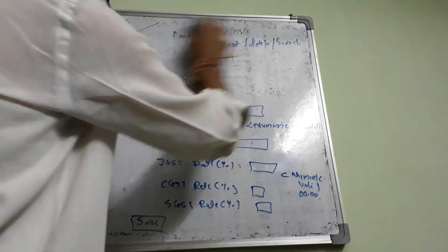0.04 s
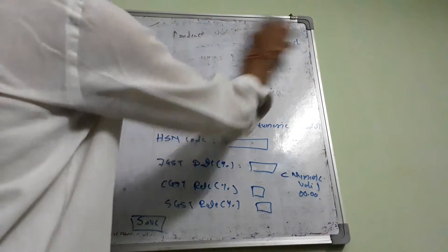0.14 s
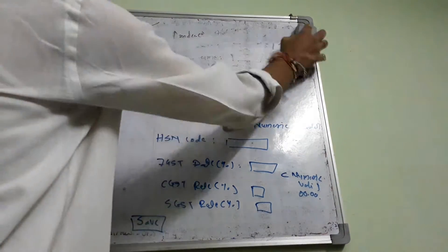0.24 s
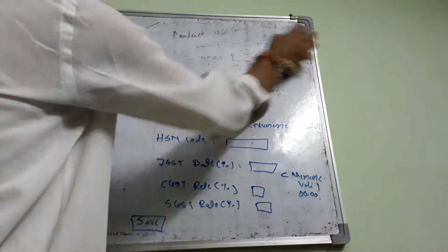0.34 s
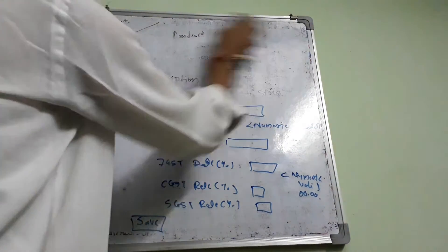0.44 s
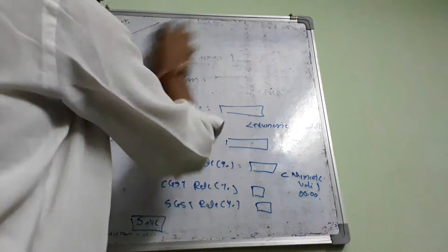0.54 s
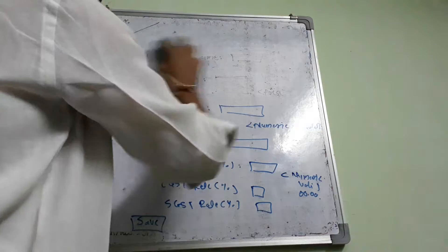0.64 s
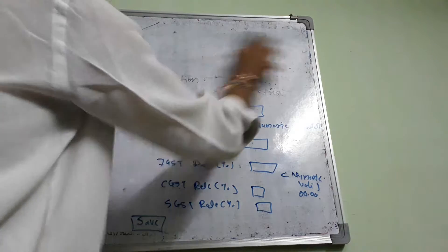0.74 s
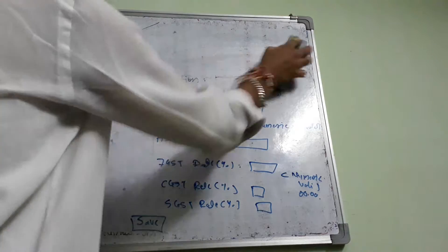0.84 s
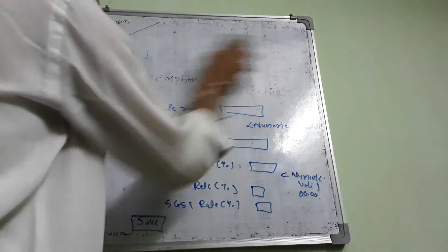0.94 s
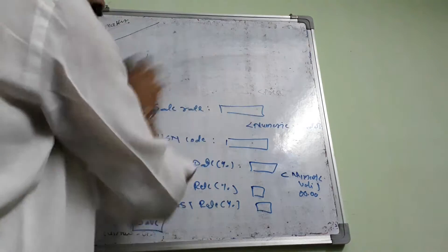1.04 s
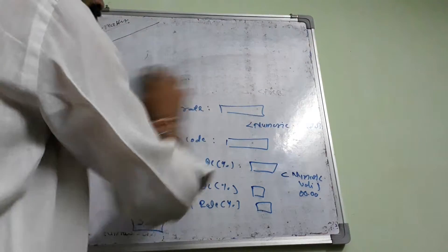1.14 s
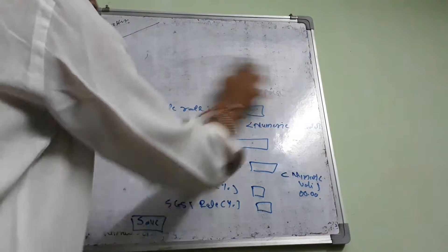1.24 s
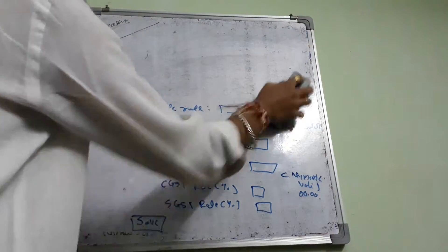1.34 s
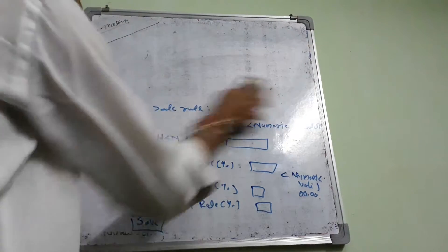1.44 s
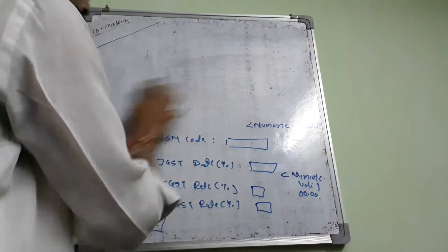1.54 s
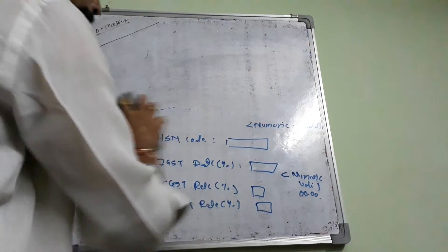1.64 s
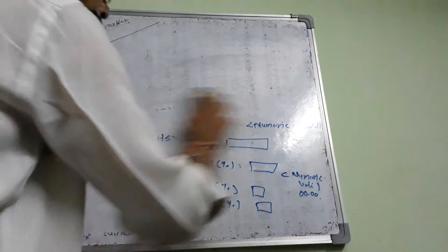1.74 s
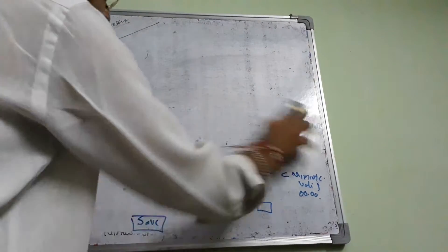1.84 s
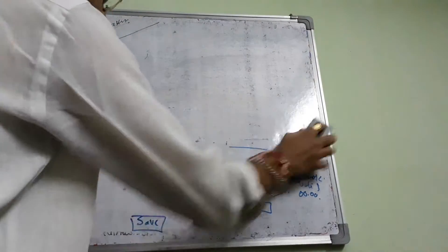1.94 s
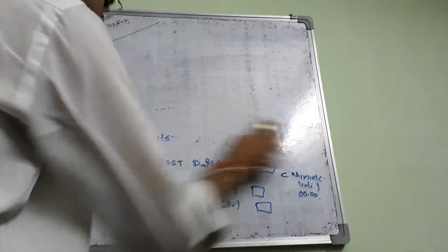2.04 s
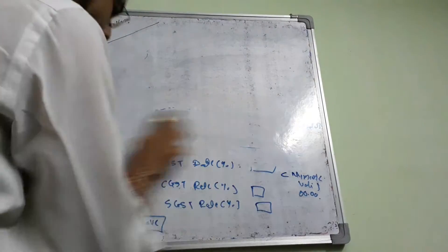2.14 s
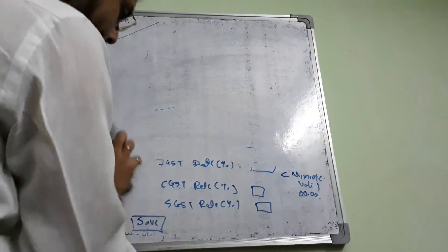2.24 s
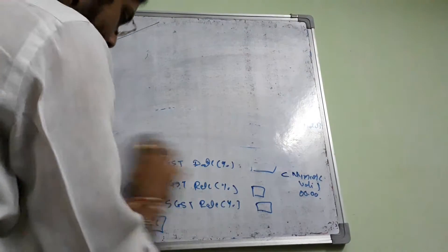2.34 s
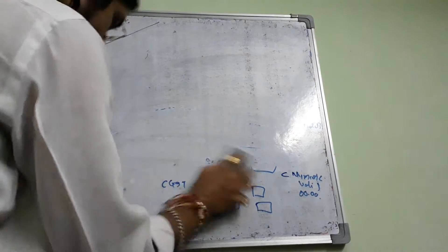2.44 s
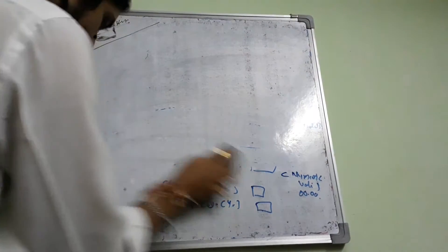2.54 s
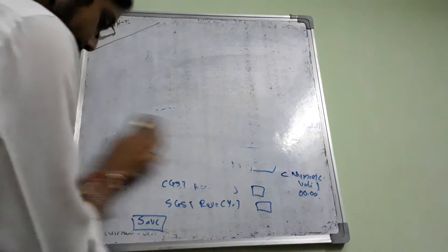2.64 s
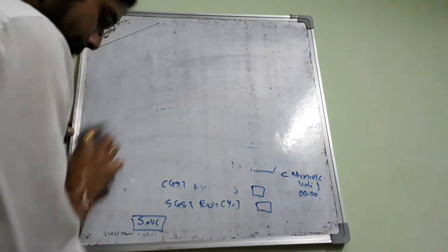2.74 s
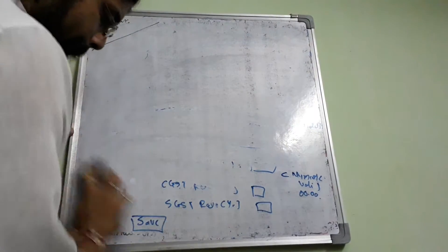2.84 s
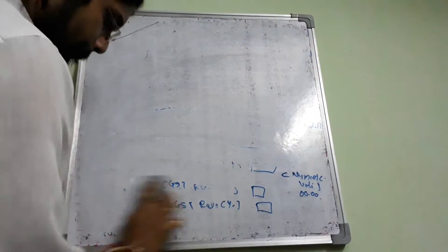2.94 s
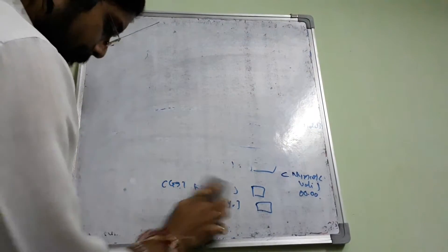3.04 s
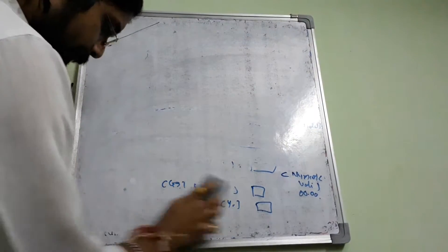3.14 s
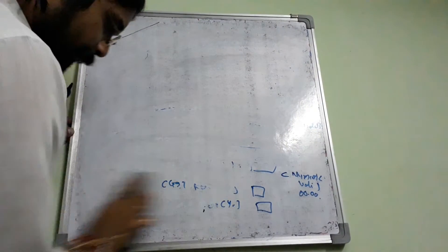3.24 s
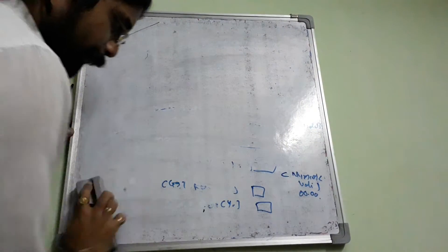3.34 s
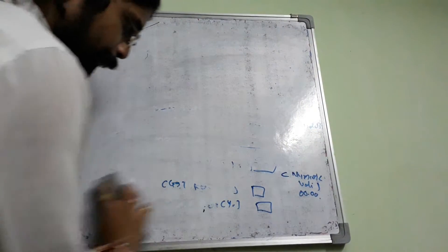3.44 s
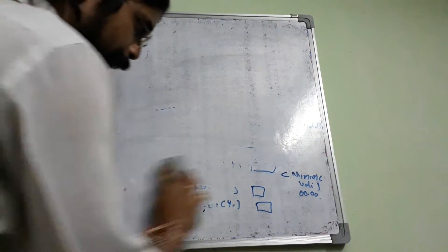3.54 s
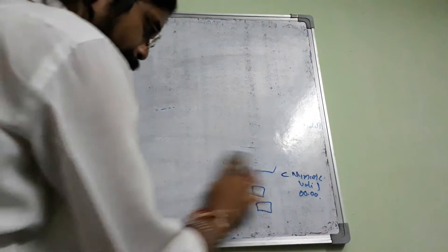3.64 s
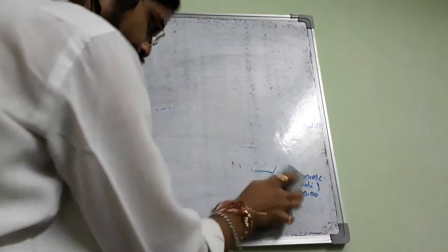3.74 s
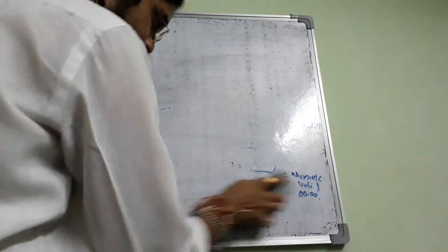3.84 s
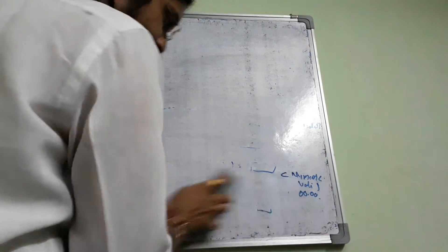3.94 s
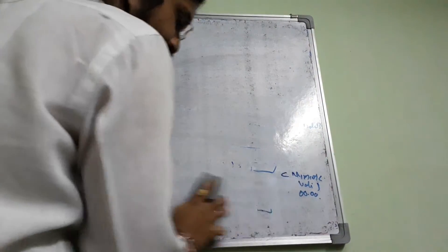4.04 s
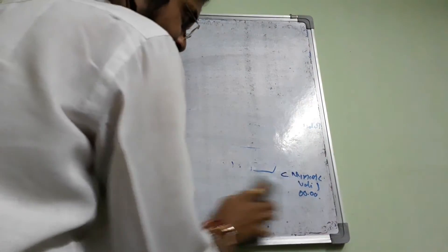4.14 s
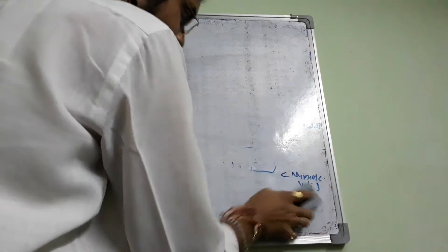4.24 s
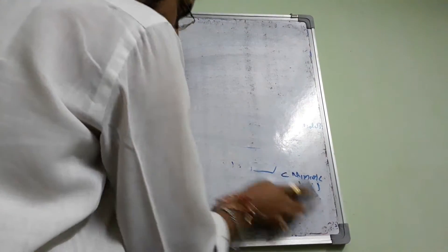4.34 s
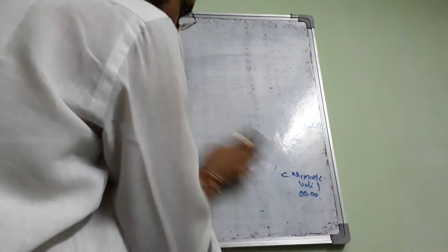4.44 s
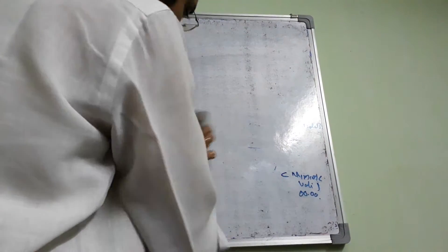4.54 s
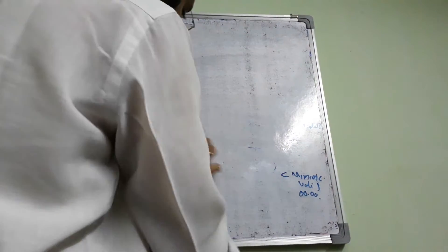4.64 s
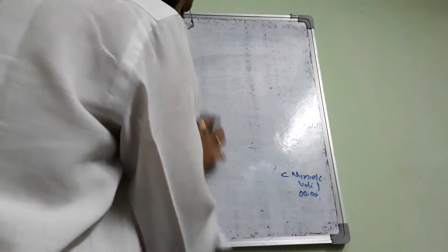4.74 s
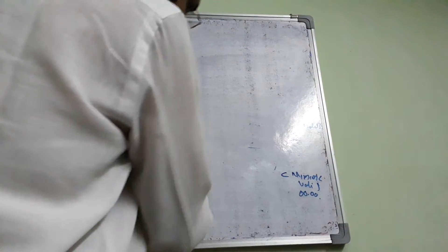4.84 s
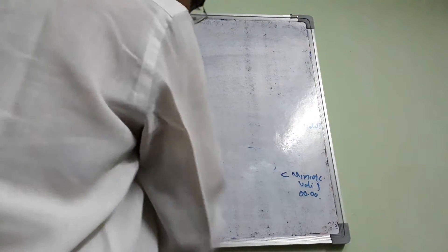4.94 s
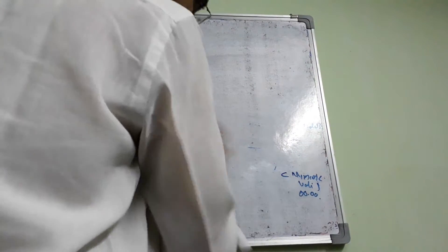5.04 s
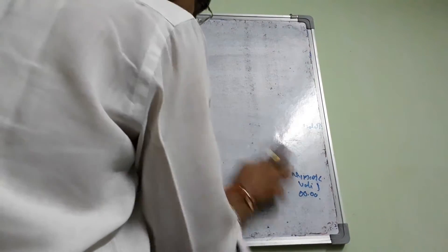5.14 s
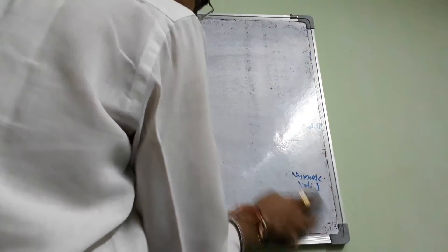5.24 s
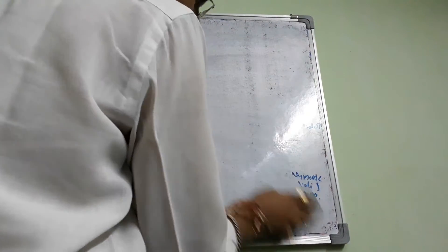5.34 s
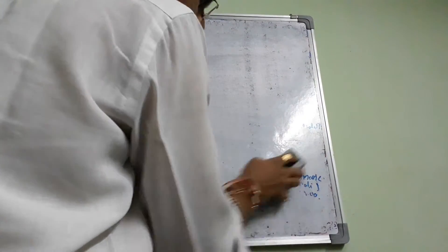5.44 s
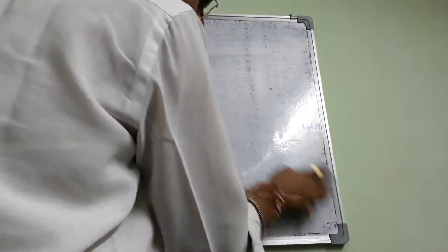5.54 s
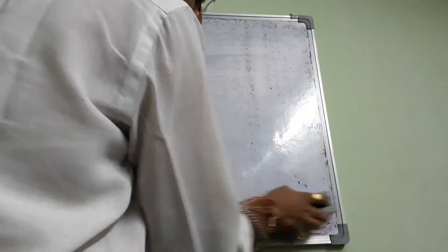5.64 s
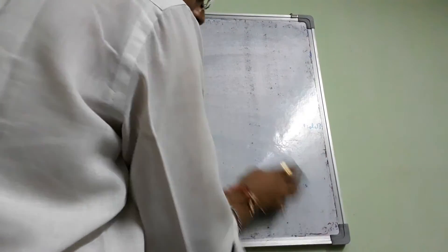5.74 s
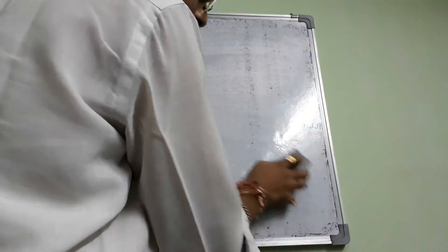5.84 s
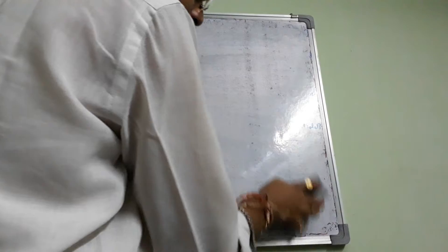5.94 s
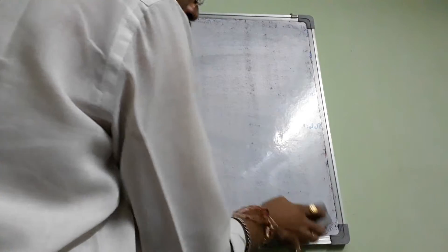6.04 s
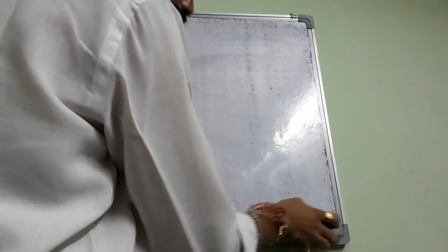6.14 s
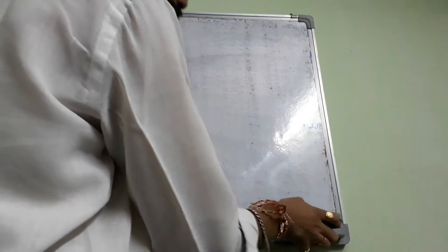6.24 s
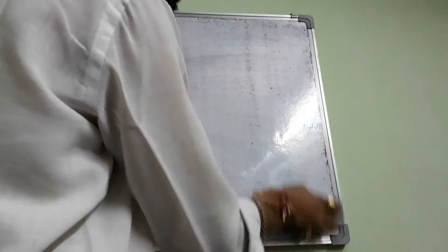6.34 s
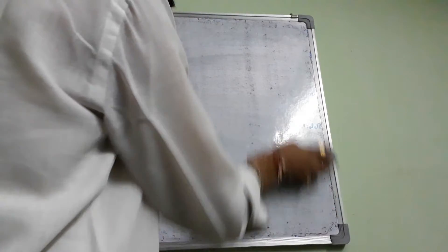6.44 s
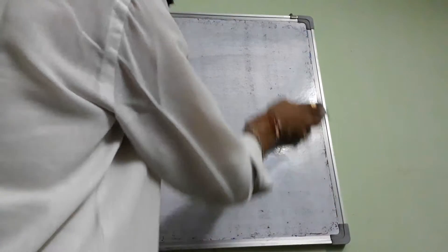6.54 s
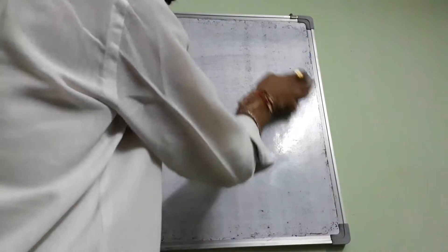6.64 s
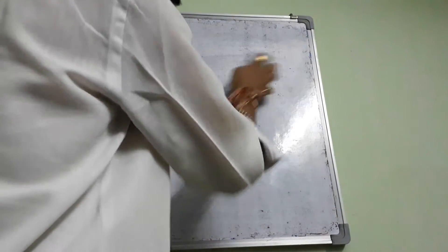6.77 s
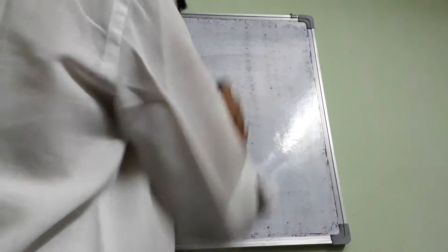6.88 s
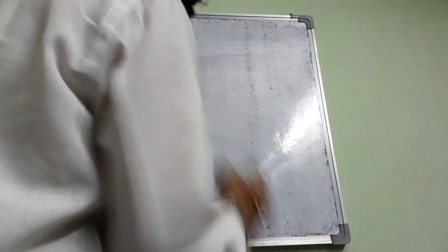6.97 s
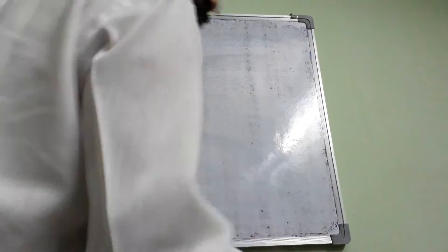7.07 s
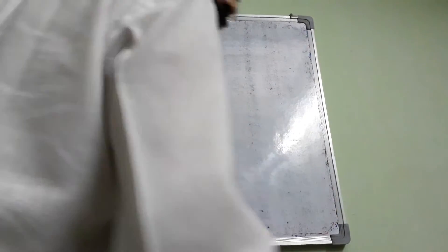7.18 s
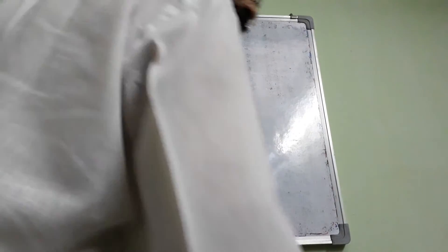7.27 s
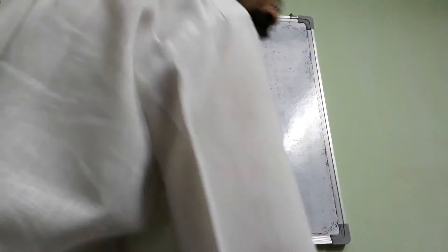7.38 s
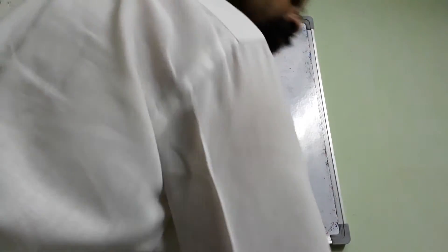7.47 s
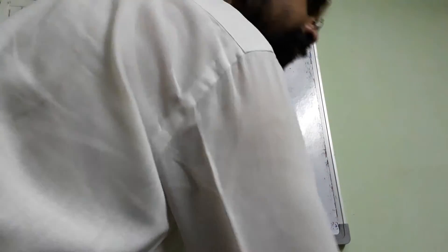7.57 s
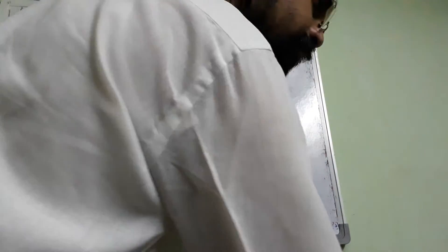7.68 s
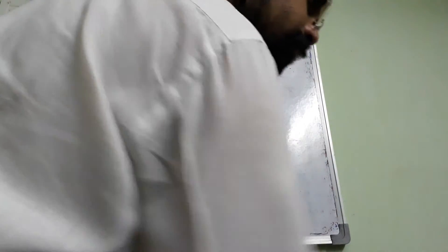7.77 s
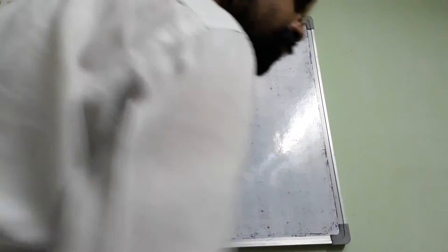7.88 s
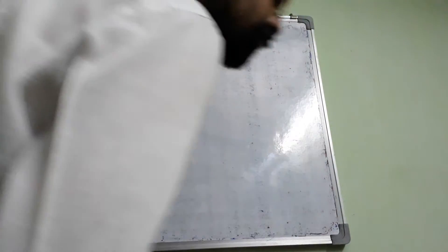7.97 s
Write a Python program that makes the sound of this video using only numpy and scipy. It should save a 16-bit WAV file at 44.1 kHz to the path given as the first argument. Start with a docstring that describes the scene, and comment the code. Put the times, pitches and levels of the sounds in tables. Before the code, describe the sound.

A low, steady fan drone fills a small hard-walled room, heard by one microphone a few steps away. From 0 s a felt eraser rubs to and fro on a whiteboard, roughly three strokes a second, each a grainy airy hiss with a lower rasp that swells and fades; the strongest is around 1 s. Between 1.1 and 2.2 s the hard shell ticks the metal frame, clicks hollowly and bumps the board softly. Mostly plain wiping follows until a bright, prominent click at 3.9 s. Strokes then become generally softer and less even, with faint ticks around 4.3-4.6 and 5.5-5.9 s. A clearer bump and tick come at 6.6 s, followed by a fuller rub and lighter ticks. At 7.5 s a loud, sharp knock hits the board, then a duller one at 7.67 s and a tight double knock at 7.75 s, with short room echo as a last rub swells.

```python
"""A felt eraser is rubbed to and fro over a whiteboard: two grainy noises that swell with each stroke.
Its hard shell taps the metal frame, clicks and rings, and bumps the board softly; at the end it knocks loudly.
Every blow sets decaying sine waves ringing, some under a short burst of noise.
A fan, made of shaped steady noise, runs in the small hard-walled room, whose echo is fading noise.
One microphone hears it all from a few steps away."""
import sys
import numpy as np
from scipy import signal
from scipy.fft import rfft, irfft, next_fast_len
from scipy.io import wavfile

SR = 44100
rng = np.random.default_rng(int(sys.argv[2]) if len(sys.argv) > 2 else 0)


def store_wav(level_fs):
    """Save 16-bit WAV to argv[1]."""
    pcm = np.round(np.clip(np.atleast_2d(level_fs), -1, 1) * 32767)
    wavfile.write(sys.argv[1], SR, pcm.T.astype(np.int16))


N = 353241   # length in samples

# Ringing tones of the board. Each row: pitch in Hz, relative level in dB, time to fade by 60 dB in seconds.
BOARD_MODES = [(666, -0.5, 0.011), (865, -4, 0.028), (1042, -1.5, 0.021), (1317, 2, 0.0098),
               (1640, 1.5, 0.0095), (2000, 1.5, 0.0093), (2550, 5.5, 0.0026), (3480, -6, 0.0046),
               (4130, -4, 0.0035), (5300, -10, 0.004)]
# Soft bumps on the board. Each row: start in seconds, knock strength in dB,
# strength in dB of the push that flexes the board.
BUMP_ROWS = [(1.139, -29, -43.5), (1.302, -34, -43), (1.913, -29.5, -62), (2.22, -33.5, -45.5),
             (3.902, -32.5, -60), (4.567, -36.5, -56), (6.5621, -21.5, -42.5), (6.655, -29, -57)]
# Loud knocks on the board. Each row: start in seconds, ringing strength in dB, crack strength in dB,
# contact cut-off in Hz, strength in dB of the push that flexes the board.
KNOCK_ROWS = [(7.4894, -8.5, -4, 5930, -36.5), (7.6682, -18.5, -30, 1510, -55),
              (7.750, -13.5, -9.5, 5130, -55), (7.7622, -9.5, -9, 3520, -38.5)]


def wiping():
    """Countless felt fibres catch and slip: dense grains whose level follows the stroke and wavers a little."""
    # Colour of the felt on enamel. Each row: pitch in Hz, relative level in dB per Hz.
    hiss_colour = [(1500, -12.5), (3000, -8.5), (4800, -4), (6500, -2), (8000, -1), (10500, -4),
                   (13000, -12.5), (15500, -20.5)]
    # Colour of the board under the felt. Each row: pitch in Hz, relative level in dB per Hz.
    rasp_colour = [(200, 0), (500, 11), (1000, 9.5), (2000, -1.5), (4000, -2.5), (6500, -8), (9000, 1.5)]
    grain_db = 1.3   # average extra size of a grain
    hiss_gain, rasp_gain = stroking()
    sizes = from_db(grain_db * rng.exponential(1, (2, N)))
    grains = rng.standard_normal((2, N)) * sizes
    hiss_waver_db = .8 * drift(15) + .7 * drift(50)
    rasp_waver_db = 1.2 * drift(12)
    hiss = coloured(grains[0], hiss_colour) * from_db(hiss_waver_db)
    rasp = coloured(grains[1], rasp_colour) * from_db(rasp_waver_db)
    return hiss_gain * hiss + rasp_gain * rasp


def stroking():
    """Each stroke speeds up, then slows down; hiss and rasp grow with speed, overlapping strokes add in power."""
    # Strokes of the felt. Each row: start in seconds, length in seconds, hiss at full speed in dB,
    # share of the stroke spent speeding up, rasp compared with hiss in dB.
    strokes = [(-0.018, 0.43, -47.5, 0.34, -1.5), (0.343, 0.37, -44, 0.57, -4), (0.62, 0.33, -47.5, 0.6, 0),
               (0.9, 0.3, -40.5, 0.4, -3), (1.058, 0.44, -47, 0.6, 3), (1.417, 0.33, -43, 0.35, -4.5),
               (1.648, 0.39, -46, 0.55, 1.5), (1.94, 0.45, -44, 0.56, -3.5),
               (2.313, 0.29, -48.5, 0.49, -1.5), (2.567, 0.4, -44.5, 0.24, -6.5),
               (2.795, 0.42, -48.5, 0.65, -1), (3.179, 0.3, -45, 0.42, -3.5), (3.31, 0.58, -48, 0.69, -1),
               (3.852, 0.46, -53, 0.07, 2.5), (4.063, 0.42, -52.5, 0.24, 1), (4.392, 0.31, -45.5, 0.39, -3),
               (4.63, 0.23, -57.2, 0.65, -8), (4.763, 0.28, -51, 0.62, -11),
               (4.967, 0.55, -49.5, 0.33, -2.5), (5.369, 0.64, -56, 0.16, -5), (5.698, 0.2, -54, 0.74, -6),
               (5.861, 0.51, -54, 0.14, -8), (6.159, 0.11, -55, 0.49, -2), (6.366, 0.11, -52.5, 0.33, -6),
               (6.409, 0.6, -47.5, 0.25, -3.5), (6.947, 0.15, -63, 0.2, 1), (7.02, 0.39, -57.5, 0.41, 3),
               (7.349, 0.2, -57.5, 0.25, -5), (7.49, 0.5, -54.5, 0.59, -1), (7.857, 0.69, -49, 1, 1)]
    hiss_exponent, rasp_exponent = 1.44, 1.94   # gain grows as speed to these powers
    rest_db = -80.5   # faint rub between strokes
    t = np.arange(N) / SR
    hiss_power = rasp_power = from_db(2 * rest_db)
    for start, length, level_db, rise, rasp_db in strokes:
        done = np.clip((t - start) / length, 0, 1)
        rise = np.clip(rise, .05, .95)
        speed = np.sin(np.pi / 2 * np.minimum(done / rise, (1 - done) / (1 - rise)))
        hiss_power = hiss_power + (from_db(level_db) * speed ** hiss_exponent) ** 2
        rasp_power = rasp_power + (from_db(level_db + rasp_db) * speed ** rasp_exponent) ** 2
    return np.sqrt(hiss_power), np.sqrt(rasp_power)


def taps():
    """The shell ticks on the metal frame: ringing, a short crack and a soft answer from the board."""
    # Ticks on the frame. Each row: start in seconds, strength in dB, brightest pitch in Hz.
    tap_rows = [(.3561, -56, 12100), (0.369, -52, 11900), (1.122, -43, 3030), (1.138, -27.5, 4800),
                (1.27, -36.5, 5500), (1.3019, -27.5, 5540), (1.427, -43, 4030), (1.609, -38.5, 3870),
                (1.826, -46, 2950), (1.846, -39.5, 4700), (2.010, -33, 5600), (2.181, -45, 3150),
                (2.191, -51, 5900), (2.219, -40, 5540), (3.866, -29.5, 4770), (3.902, -39.5, 5000),
                (4.2999, -49, 3100), (4.366, -49.5, 5000), (4.406, -44.5, 4930), (4.463, -49, 3200),
                (4.568, -47, 3180), (5.478, -52, 2500), (5.538, -48, 2650), (5.658, -48.5, 5000),
                (5.91, -32.5, 5440), (6.5605, -30, 5600), (6.652, -36.5, 6500), (6.906, -47, 2930),
                (7.127, -49, 2200), (7.2118, -37, 5600), (7.249, -44.5, 3600), (7.396, -48, 2960),
                (7.857, -39, 10300)]
    # Ringing of the metal edge. Each row: pitch in Hz, relative level in dB, time to fade by 60 dB in seconds.
    frame_modes = [(2100, 16.5, 0.0053), (3010, 1, 0.01), (3680, 9, 0.0063), (4370, 1.5, 0.015),
                   (4970, 5.5, 0.0044), (5740, -6, 0.024), (6250, 11.5, 0.0046), (6490, -9.5, 0.032),
                   (7280, 13, 0.0024), (8570, -1, 0.016), (10150, 4, 0.0071), (11900, 3, .01),
                   (12700, -4, 0.013)]
    loss_db_per_octave = 10   # for tones away from the brightest pitch
    crack_db, board_db = -5, -5   # compared with the tick strength
    s, tick_db, tick_hz = np.transpose(tap_rows)
    octaves = np.log2(np.array(frame_modes)[:, 0] / tick_hz[:, None])
    frame = strike(frame_modes, s, tick_db[:, None] - loss_db_per_octave * np.abs(octaves))
    crack = cracks(s, tick_db + crack_db, .009, low_hz=3500, high_hz=14000)
    board = strike(BOARD_MODES[1:4], s, tick_db + board_db)
    return frame + crack + resonance(board, 950, 600)   # the band rounds the edges


def clicks():
    """The hollow shell clicks and rings; the yielding contact makes it swell over a few cycles."""
    # Clicks of the shell. Each row: start in seconds, strength in dB before the swell.
    click_rows = [(1.121, -31), (1.599, -37), (1.609, -22.5), (1.845, -42), (2.011, -31.5), (2.191, -25.5),
                  (3.866, -11.5), (4.567, -37.5), (5.479, -46), (5.538, -37), (5.658, -29.5),
                  (5.911, -30.5)]
    # Ringing of the shell. Each row: pitch in Hz, relative level in dB, time to fade by 60 dB in seconds.
    shell_modes = [(2800, 0, .018), (3050, -3, .012), (2500, -9, .01), (3500, -6, .01)]
    rings = strike(shell_modes, *np.transpose(click_rows), contact_s=0)
    return resonance(resonance(rings, 2950, 1200), 2950, 1200)


def bumps():
    """Soft bumps ring three of the board's tones, with rounded edges."""
    s, bump_db, _ = np.transpose(BUMP_ROWS)
    return resonance(strike(BOARD_MODES[1:4], s, bump_db), 950, 600)


def knocks():
    """Flat blows ring all the board's tones under a broad crack; the small board radiates little bass."""
    s, peak_db, crack_db, cut_hz, _ = np.transpose(KNOCK_ROWS)
    blows = cracks(s, crack_db, .004, low_hz=2500, high_hz=6500)
    for at, level_db, hz in zip(s, peak_db, cut_hz):
        ringing = strike(BOARD_MODES, [at], level_db, contact_s=0)
        blows += signal.lfilter(*signal.butter(2, hz, fs=SR), ringing)   # a lower cut-off is duller
    return signal.sosfilt(signal.butter(2, 450, "high", fs=SR, output="sos"), blows)


def flexing():
    """Bumps and knocks push the whole board, which flexes slowly in the bass."""
    # Flexing of the board. Each row: pitch in Hz, relative level in dB, time to fade by 60 dB in seconds.
    panel_modes = [(208, 1.5, 0.51), (240, 10.5, 0.099), (296, 2.5, 0.39)]
    lag_s = .006   # the push follows the contact
    pushes = [(row[0] + lag_s, row[-1]) for row in BUMP_ROWS + KNOCK_ROWS]
    s, push_db = np.transpose(pushes)
    return resonance(strike(panel_modes, s, push_db), 150, 145)


def strike(modes, times, peaks_db, contact_s=.005):
    """Each blow rings every tone with its own strength and start; an uneven landing spreads the starts."""
    spread_db = 1.5   # how much strengths vary from blow to blow
    shape, out = (len(times), len(modes)), np.zeros(N)
    starts_s = np.reshape(times, (-1, 1)) + contact_s * rng.random(shape)
    at = (starts_s * SR).astype(int)
    strength_db = np.reshape(peaks_db, (len(at), -1)) + spread_db * rng.standard_normal(shape)
    for k, (hz, level_db, t60) in enumerate(modes):
        impulses = np.zeros(N)
        impulses[at[:, k]] = from_db(strength_db[:, k] + level_db) * (-1) ** k   # signs alternate
        out += ring(impulses, hz, t60)
    return out


def ring(impulses, hz, t60):
    """A unit impulse starts a sine of height about 1 that fades by 60 dB in t60 seconds."""
    r, w = from_db(-60 / (t60 * SR)), 2 * np.pi * hz / SR
    # the tiny offset avoids extremely small numbers
    return signal.lfilter([0, np.sin(w)], [1, -2 * r * np.cos(w), r * r], impulses + 1e-18)


def cracks(times, peaks_db, t60, low_hz, high_hz):
    """Bursts of random signs die within milliseconds, then a filter keeps a broad band of them."""
    out, size = np.zeros(N), 512
    fade = from_db(-60 * np.arange(size) / SR / t60)
    all_signs = rng.choice([-1, 1], (len(times), size))
    for s, peak_db, signs in zip(times, peaks_db, all_signs):
        start = int(s * SR)
        out[start:start + size] += from_db(peak_db) * fade * signs
    return signal.lfilter(*signal.butter(1, [low_hz, high_hz], "band", fs=SR), out)


def resonance(x, hz, width_hz):
    """Let through a band around one pitch, with gain about 1 at its top."""
    r = np.exp(-np.pi * width_hz / SR)
    feedback = [1, -2 * r * np.cos(2 * np.pi * hz / SR), r * r]
    return signal.lfilter([(1 - r * r) / 2, 0, (r * r - 1) / 2], feedback, x)


def coloured(x, spectrum):
    """Shape the pitches of a flat noise, then scale it to an rms level of 1."""
    size = next_fast_len(N)
    hz = np.maximum(np.arange(size // 2 + 1) * SR / size, 1)
    shaped = rfft(x, size) * from_db(at_hz(spectrum, hz))
    return rms_one(irfft(shaped, size)[:N])


def drift(rate):
    """Slow random wavering of rms 1: noise smoothed by two equal low-pass steps at about rate Hz."""
    step = 40   # samples between slow points
    r = np.exp(-2 * np.pi * rate * step / SR)
    noise = rng.standard_normal(N // step + 2002)
    slow = signal.lfilter([1], [1, -2 * r, r * r], noise)[2000:]   # skip the start-up
    return np.interp(np.arange(N) / step, np.arange(len(slow)), rms_one(slow))


def from_db(db):
    """Turn decibels into a gain."""
    return 10 ** (np.asarray(db) / 20)


def rms_one(x):
    """Scale to an rms level of 1."""
    return x / np.sqrt(np.mean(x ** 2) + 1e-20)


def at_hz(points, hz):
    """Read between the rows of a table of Hz and value, on a log-frequency axis."""
    table_hz, values = np.array(points)[:, 0], np.array(points)[:, 1]
    return np.interp(np.log(hz), np.log(table_hz), values)


def room(x):
    """Reflections: half-octave bands of noise, each dying at its own rate, starting after the first wall."""
    # Fading of the echo. Each row: pitch in Hz, time to fade by 60 dB in seconds.
    echo_times = [(400, 0.59), (1060, 0.36), (2790, 0.37), (7350, 0.16)]
    size, gap = SR, int(.002 * SR)   # one second of echo after a 2 ms wait
    t, echo = np.arange(size) / SR, np.zeros(size)
    edges = 125 * 2 ** np.arange(0, 7.3, .5)
    noises = rng.standard_normal((len(edges), size))
    for low, high, noise in zip(edges, edges[1:], noises):
        band = signal.sosfilt(signal.butter(2, [low, high], "band", fs=SR, output="sos"), noise)
        echo += band * from_db(-60 * t / at_hz(echo_times, np.sqrt(low * high)))
    echo = echo / np.sqrt(np.sum(echo ** 2))
    return signal.fftconvolve(x, np.concatenate([np.zeros(gap), echo]))[:N]


def fan():
    """Steady air noise wavers slowly; some low bands of noise are held up by the room."""
    # Colour of the air noise. Each row: pitch in Hz, relative level in dB per Hz.
    air_colour = [(18, -45), (35, -19.5), (118, -3.5), (227, -1), (295, -2.5), (461, -6.5), (569, -5),
                  (801, -6.5), (889, -8.5), (1040, -13.5), (1860, -19), (3220, -23), (16000, -43)]
    # Low bands held by the room. Each row: pitch in Hz, width in Hz of each of two filter passes, level in dB.
    drone_bands = [(96.4, 7.8, -64), (129.2, 42, -59), (194.4, 14.4, -52.5), (233.5, 30, -55),
                   (275, 20, -57.5)]
    air_db = -47.5
    out = coloured(rng.standard_normal(N), air_colour) * from_db(air_db + drift(1))
    white = rng.standard_normal(N)
    for hz, width_hz, level_db in drone_bands:
        band = resonance(resonance(white, hz, width_hz), hz, width_hz)
        out += from_db(level_db) * rms_one(band)
    return out


def scene():
    """Eraser and board, direct and reflected, over the fan; both channels carry the one microphone."""
    rub, tap, click, knock = wiping(), taps() + bumps(), clicks(), knocks()
    # share of each sound sent to the room, in dB
    sent = from_db(-12) * rub + from_db(-4) * tap + from_db(-11) * click + from_db(.5) * knock
    direct = rub + tap + click + knock + flexing()
    return np.tile(direct + room(sent) + fan(), (2, 1))


def record(dry):
    """The microphone capsule lifts two treble bands, dips below them and drops deep bass; the top is cut."""
    # Capsule resonances. Each row: pitch in Hz, width in Hz, lift in dB.
    mic_peaks = [(9010, 450, 8), (10200, 2400, 4)]
    # Dip under the resonances: pitch in Hz, width in Hz, share removed.
    mic_notch = (7940, 1100, 0.51)
    cutoff_hz = 15750
    heard = dry
    for hz, width_hz, lift_db in mic_peaks:
        heard = heard + (from_db(lift_db) - 1) * resonance(dry, hz, width_hz)
    hz, width_hz, share = mic_notch
    heard = heard - share * resonance(heard, hz, width_hz)
    heard = signal.sosfilt(signal.butter(2, 50, "high", fs=SR, output="sos"), heard)
    return signal.sosfilt(signal.ellip(12, .5, 70, cutoff_hz, fs=SR, output="sos"), heard)


dry = scene()
out = record(dry)
store_wav(out)
```